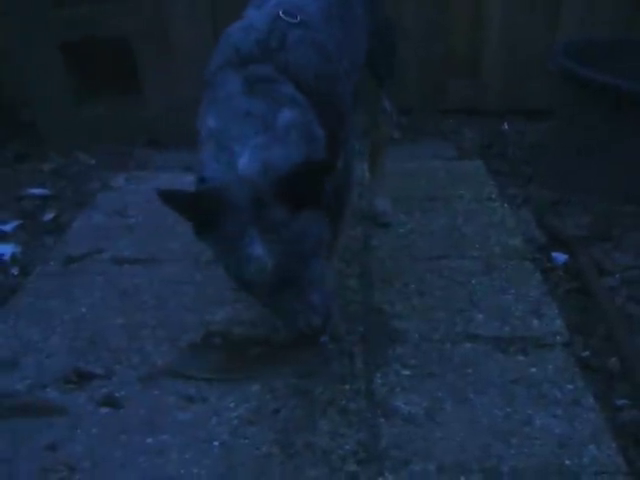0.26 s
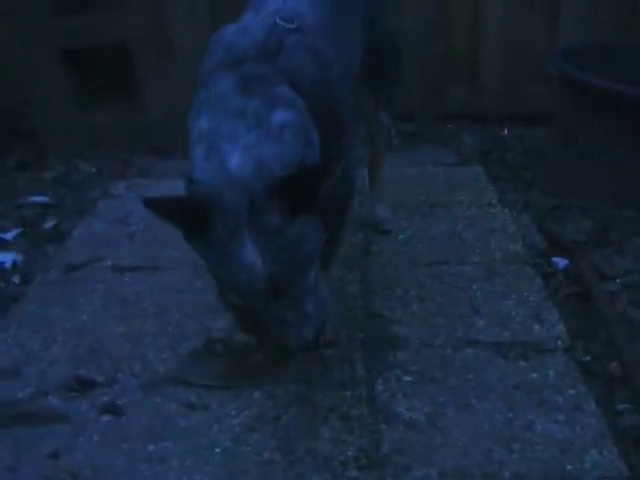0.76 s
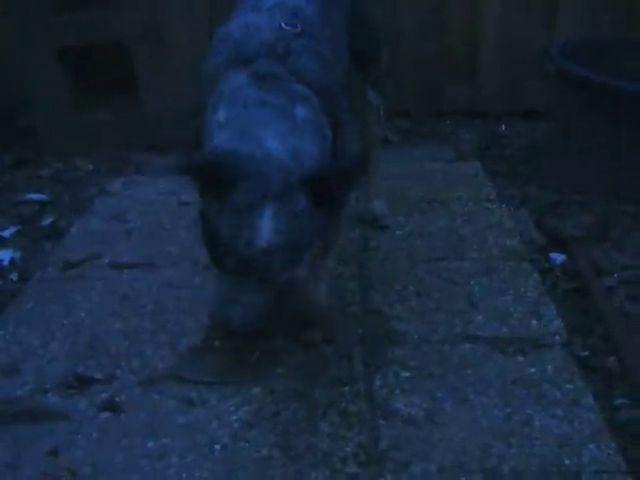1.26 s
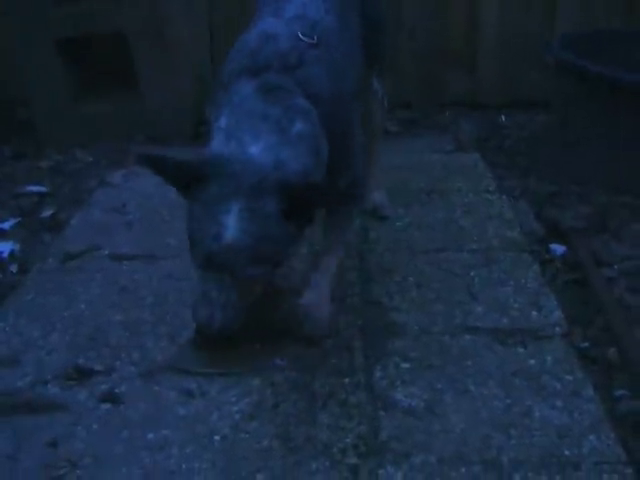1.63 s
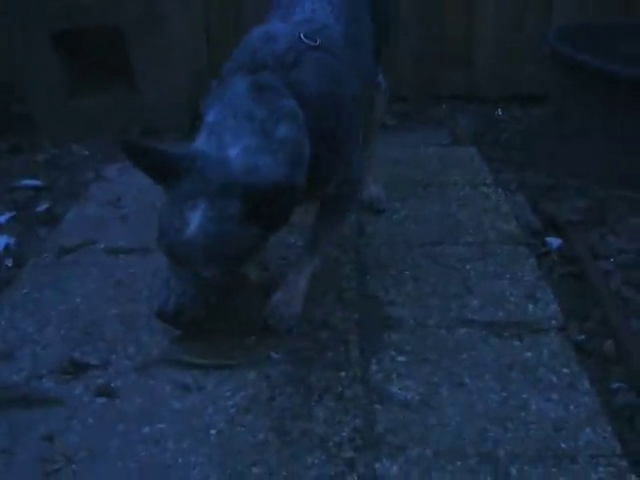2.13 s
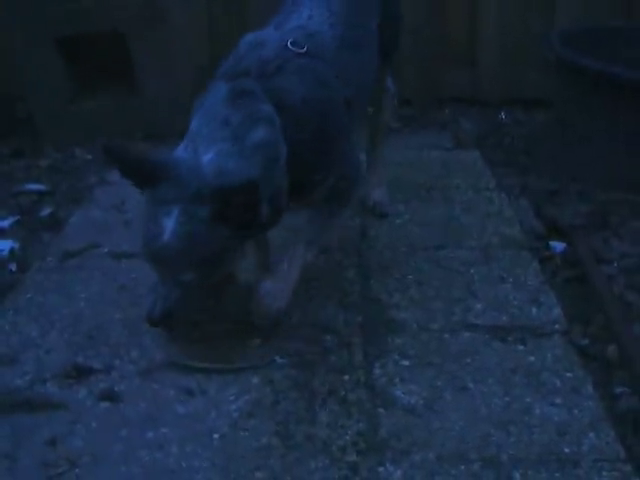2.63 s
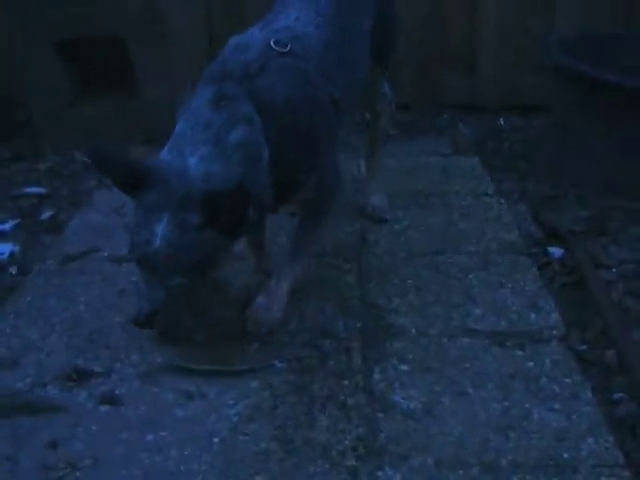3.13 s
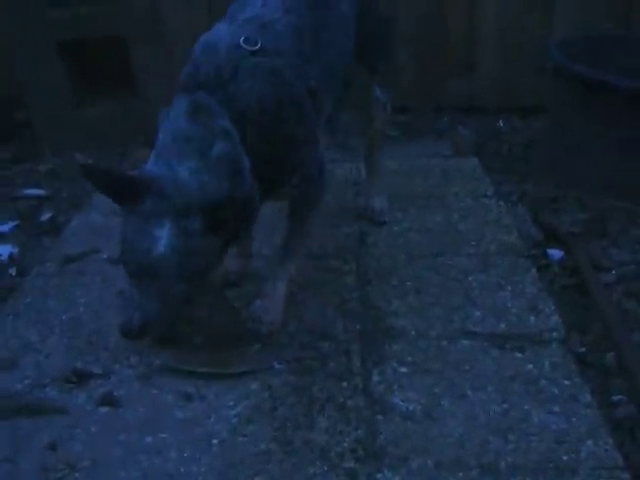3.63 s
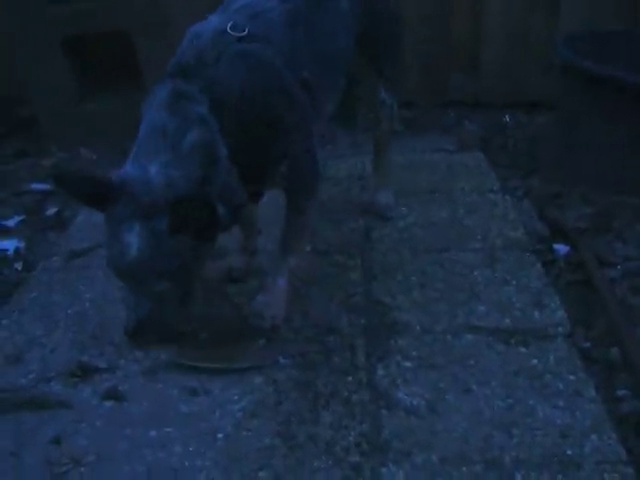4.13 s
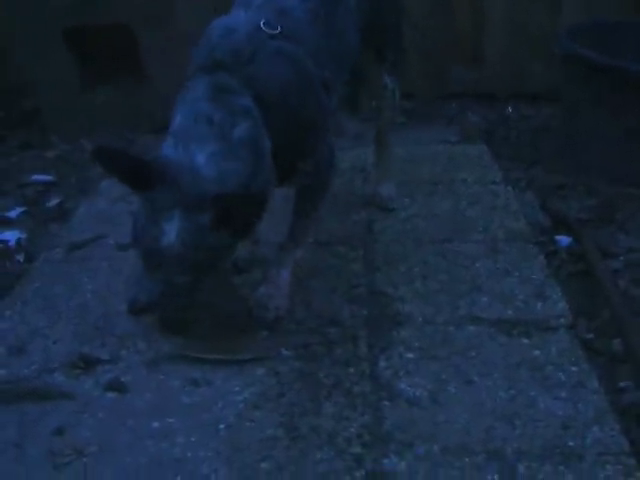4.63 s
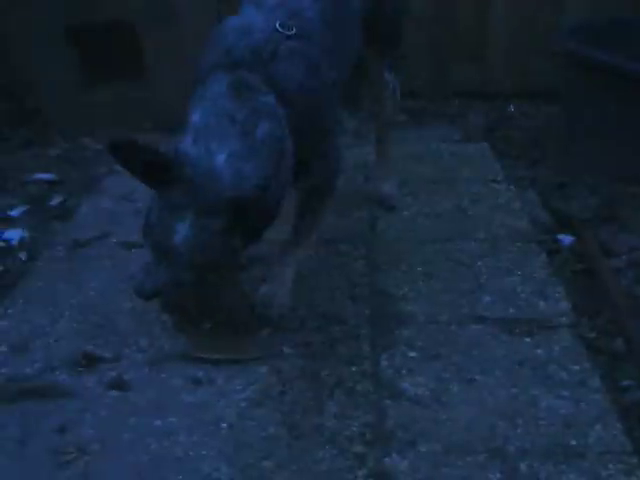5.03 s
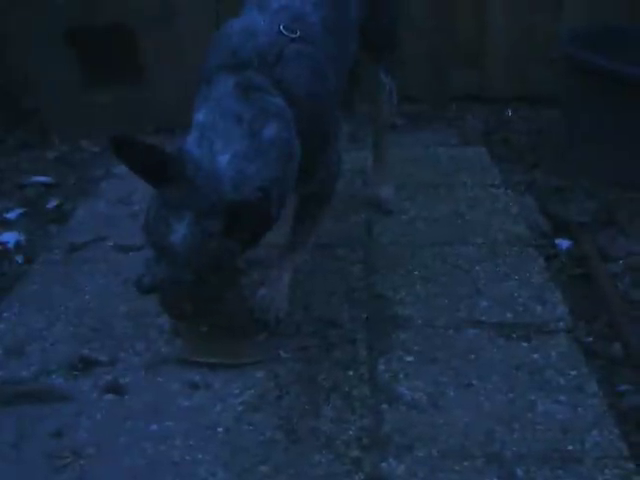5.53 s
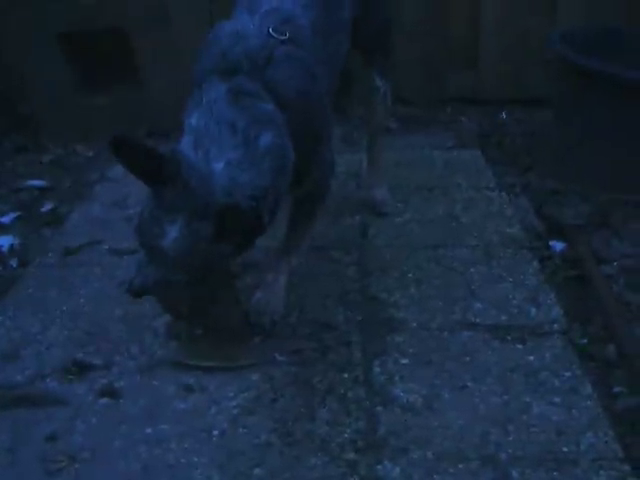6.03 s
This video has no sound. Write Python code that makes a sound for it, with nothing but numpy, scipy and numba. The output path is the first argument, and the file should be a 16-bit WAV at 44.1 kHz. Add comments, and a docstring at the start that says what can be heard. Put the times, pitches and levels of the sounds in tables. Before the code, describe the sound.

A dog chews a raw fish from a dish on an outdoor paved path, heard close through a small microphone with muffled treble. A soft bed of distant town hiss and hum, with faint road rumble, runs throughout. Quiet wet grinding begins at once; light snaps come at 0.3 and 0.55 s, doubled crunches near 0.7 and 1.0, and a firm crack at 1.5. At about 2.02 and 2.06 two very loud snaps crack in a quick cluster, knocking the dish into a brief ring, with smaller clicks to 2.2. The hardest bite lands at 2.68, ringing the dish again. Wet grinding swells around 2.5 and 3.25; a crisp click falls at 3.22 and a stronger snap at 3.74. From 4 to 6.3 s only small scattered crunches and ticks remain. Faint hollow drips, some low and some higher, dot the whole scene, and hard snaps leave a short yard echo.

```python
"""Snaps, knocks and wet crunching: a dog eats a raw fish from a dish on a paved path, a metre or two from a small camera.
Snaps and knocks are a broad crack, brief rings and a thud; crushing and grinding are bursts and streams of short grains.
Hard bites ring the dish and water drips on two hollow things, all as sums of decaying modes.
A scattered tail returns from fence and wall; the town and a far road are shaped noise behind.
The sound is muffled above about 4 kHz, and the loudest peaks are rounded off."""
import sys
import numpy as np
from scipy import signal
from scipy.fft import rfft, irfft
from scipy.io import wavfile
from scipy.ndimage import uniform_filter1d
from numba import njit

SR = 44100
rng = np.random.default_rng(int(sys.argv[2]) if len(sys.argv) > 2 else 0)


def generate_wav(signal):
    """Clip the signal to [-1, 1] and save it as 16-bit WAV at the path in sys.argv[1]."""
    frames = np.transpose(np.atleast_2d(signal))
    scaled = np.clip(frames, -1, 1) * 32767
    pcm = np.round(scaled).astype(np.int16)
    wavfile.write(sys.argv[1], SR, pcm)


N = 276507


def undb(db):
    """Amplitude factor of a level in dB."""
    return 10 ** (np.asarray(db) / 20)


def level(x, db):
    """Scale a sound by its RMS to a level in dB."""
    return x * undb(db) / np.sqrt(np.mean(x ** 2))


def ring(hz, t60, swell_s):
    """One decaying mode with peak 1; a soft contact lets it swell for a moment."""
    t = np.arange(int(t60 * SR) + 8) / SR
    decay = 1000. ** (-t / t60)
    swell = 1 - np.exp(-t / swell_s)
    sound = np.sin(2 * np.pi * hz * t) * decay * swell
    return sound / np.max(np.abs(sound))


def add(out, s, sound):
    """Mix a sound in at time s."""
    i = int(s * SR)
    out[i:i + len(sound)] += sound[:max(len(out) - i, 0)]


@njit
def grains(start, hz, decay_radians, size, count):
    """Each grain is a sine that swells and dies within a few cycles, its envelope t * exp(-t / tau)."""
    out = np.zeros(count + 4096)
    for g in range(len(start)):
        w = 2 * np.pi * hz[g] / SR
        tau = decay_radians[g] / w  # samples
        phasor = size[g] * np.e / tau + 0j  # brings the envelope's peak to size
        step = np.exp(1j * w - 1 / tau)
        for i in range(min(int(9 * tau), 4000)):
            out[start[g] + i] += i * phasor.imag
            phasor *= step
    return out[:count]


def walk(rate):
    """Random levels held 1 / rate s and slewed twice; spread near 1."""
    k = int(SR / rate)
    held = np.repeat(rng.standard_normal(N // k + 1), k)
    return 1.2 * uniform_filter1d(uniform_filter1d(held, k), k)[:N]


def snaps_and_knocks():
    """Snaps and knocks: a broad crack, brief low and high rings and a thud."""
    # snaps and knocks: [t/s, level/dB, low ring f/Hz, high ring f/Hz, high ring re level/dB, thud re level/dB]
    hits = [(0.2977, -25.5, 1240, 2600, -25, -5), (0.548, -28, 1580, 2700, -2, 0),
            (0.6896, -20, 1880, 2520, -2.5, -4), (0.7183, -19.5, 1810, 2970, -5, -7),
            (1.011, -21.5, 950, 2500, -11, -13), (1.027, -14.5, 1890, 3040, 3, -7),
            (1.347, -25, 2010, 2390, -13, -0.5), (1.3567, -20.5, 2130, 2460, -5.5, -24.5),
            (1.41, -25.5, 2280, 2500, -7, -30), (1.511, -8.5, 1600, 2385, -2, -0.5),
            (1.8318, -24.5, 2260, 2320, -8.5, 0.5), (1.852, -20, 1160, 3090, 0.5, -21),
            (2.0189, -0.5, 1623, 3420, -17, -6), (2.0295, -8, 1760, 2490, -18.5, -7),
            (2.0596, -1, 1495, 2790, -9, -1), (2.0688, -10.5, 1710, 2430, -13.5, -0.5),
            (2.078, -5, 1400, 2900, -4, -10), (2.1226, -18, 1670, 3130, -6.5, -11),
            (2.147, -29.5, 1580, 2960, -1.5, -8), (2.1827, -20, 1460, 3170, 0, -23),
            (2.188, -12.5, 1710, 2940, 0, -31), (2.2067, -15.5, 1480, 2400, -10.5, -31),
            (2.457, -25, 1760, 2980, 4, -5.5), (2.4678, -31.5, 1100, 2340, 1, 10),
            (2.6752, 2, 1582, 3040, -17.5, -9.5), (2.687, -7, 1680, 2600, -22, -12),
            (2.823, -23.5, 1470, 3060, -6, -21), (2.894, -30, 1610, 3030, -1.5, -21),
            (3.0332, -31.5, 1350, 2800, 1, -20), (3.054, -24.5, 1070, 3050, -5, -17),
            (3.1998, -20.5, 1100, 3240, 0, -21), (3.2198, -11, 1060, 3510, 0, -25),
            (3.2452, -21, 1080, 3040, 0, -20), (3.678, -27, 1430, 2310, -14, -14),
            (3.7264, -28, 1750, 2250, -6, -28), (3.7341, -22, 1780, 2900, 2, -29),
            (3.7447, -9, 1456, 2230, -6.5, -34), (3.8395, -23.5, 1700, 2990, 0, -13),
            (3.875, -23.5, 1480, 2860, -5.5, -20), (4.0138, -30, 1090, 3220, 0, -12),
            (4.129, -23, 1200, 2740, -15.5, -5), (4.16, -26, 1700, 3380, 0, -12),
            (4.5562, -24.5, 1260, 2950, -2, -27), (4.623, -28, 2090, 2670, 0.5, -21),
            (4.693, -19, 1230, 3010, 0, -29), (4.8228, -21.5, 1650, 2630, -7.5, -14),
            (5.436, -27.5, 1670, 2940, -8.5, -6), (5.4846, -28.5, 2000, 2260, -12.5, -17),
            (5.6336, -27, 1300, 2350, -3, -25), (5.8366, -18, 1100, 2500, -3, -3.5),
            (6.249, -23.5, 1150, 2950, -6, -12)]
    # thud modes: [f/Hz, level/dB, t60/s, swell/s]
    thud_modes = [(600, 0, .011, .0003), (920, -5, .009, .0003), (300, -19, .015, .001)]
    low_t60_s, high_t60_s = .009, .006
    out = np.zeros(N)
    for s, hit_db, low_hz, high_hz, high_db, thud_db in hits:
        high = min(undb(high_db), .99)  # always leaves some low ring
        low = np.sqrt(1 - high ** 2)
        crack = np.sqrt(high) * ring(high_hz * .9, .0015, .0001)
        add(out, s, undb(hit_db - 2) * crack)
        add(out, s, undb(hit_db) * low * ring(low_hz, low_t60_s, 0.00067))
        add(out, s, undb(hit_db) * high * ring(high_hz, high_t60_s, .0003))
        for hz, db, t60, swell_s in thud_modes:
            add(out, s, undb(hit_db + thud_db + db) * ring(hz, t60, swell_s))
    return out


def crushes(count=50):
    """A bite breaks many splinters in a burst of grains that swells fast and fades."""
    # crushing bites: [t/s, length/s, level/dB, centre f/Hz]
    bites = [(0.666, 0.036, -28, 2840), (0.704, 0.047, -26, 2760), (0.95, 0.021, -33.5, 2770),
             (1.008, 0.052, -20.5, 2350), (1.06, .04, -36, 2940), (1.338, 0.045, -29, 2160),
             (1.396, 0.031, -31, 2960), (1.511, 0.029, -21.5, 1820), (1.805, 0.029, -32, 2300),
             (1.83, 0.047, -24, 1720), (1.984, 0.018, -24, 3330), (2.018, 0.021, -14, 2500),
             (2.058, 0.03, -16, 2500), (2.098, 0.055, -32, 2600), (2.184, .012, -18.5, 2940),
             (2.196, 0.044, -23, 1938), (2.326, 0.029, -34, 1820), (2.445, 0.039, -28.5, 1930),
             (2.519, 0.028, -34.5, 2140), (2.591, 0.016, -32, 1410), (2.645, 0.031, -25.5, 3000),
             (2.684, 0.012, -22, 2400), (2.764, 0.012, -34.5, 3000), (2.787, 0.022, -29.5, 3000),
             (3.041, 0.036, -32.5, 1134), (3.162, .04, -35, 2800), (3.25, 0.077, -35, 1000),
             (3.36, 0.058, -28, 2880), (3.722, 0.027, -23.5, 2470), (3.742, 0.024, -19.5, 1650),
             (3.854, 0.042, -37.5, 1810), (3.915, 0.065, -33, 2660), (4.106, 0.063, -34, 3100),
             (4.524, 0.068, -31.5, 2500), (4.602, 0.037, -32, 2060), (4.69, 0.033, -25, 2720),
             (4.817, 0.043, -32, 1650), (4.996, 0.043, -36.5, 1440), (5.034, 0.059, -34.5, 2080),
             (5.145, 0.036, -35, 2690), (5.196, 0.018, -35.5, 2400), (5.245, 0.051, -36.5, 1950),
             (5.425, 0.03, -35.5, 1920), (5.465, .055, -32.5, 2160), (5.627, 0.031, -33, 2400),
             (5.825, 0.031, -30, 1820), (5.888, .04, -34, 2040), (6.112, 0.026, -31.5, 2500),
             (6.235, .03, -35, 1900)]
    s, length_s, db, hz = np.transpose(bites)
    # a longer bite breaks pieces of more sizes, up to a widest spread and the ring of the smallest splinter
    octaves_per_s, widest_octaves, smallest_hz = 36, 1.32, 4200
    limit = np.minimum(widest_octaves, np.log2(smallest_hz / hz))
    octaves = np.clip(octaves_per_s * length_s, 0, limit)
    late, pitch, nudge, size, sign = rng.random((len(s), count, 5)).T
    start = np.clip((s + length_s * late) * SR, 0, N - 1).astype(np.int64)
    grain_hz = np.minimum(hz * 2 ** (octaves * (pitch + nudge - 1)), 4500)
    shape = np.sin(np.pi * late ** .5)
    # most splinters are small, a few are large, none is larger than the bone allows
    size_db = 3.0 * np.minimum(-np.log(1 - size), 3)
    gain = undb(db + size_db) * np.sqrt(length_s / 0.11) * shape * np.sign(sign - .5)
    return grains(start.ravel(), grain_hz.ravel(), np.full(start.size, 5.0), gain.ravel(), N)


def grind():
    """Steady fine grains of flesh and scale; brightness shifts weight to the high ones."""
    # grinding of the jaws: [t/s, level/dB]
    grinding = [(0.0, -45), (0.5, -45.5), (1.27, -39.5), (1.68, -42), (2.27, -47.5), (2.55, -34),
                (2.95, -42), (3.25, -34), (3.5, -41), (4.3, -41.5), (6.27, -41)]
    grains_per_s, bright_db_per_octave = 900, 0.9
    s, pitch, size, sign = rng.random((int(grains_per_s * N / SR), 4)).T
    s = s * N / SR
    octave = 2.6 * pitch  # above 700 Hz
    when, level_db = np.transpose(grinding)
    tilt_db = bright_db_per_octave * (octave - 1.3)
    size_db = 2.76 * np.minimum(-np.log(1 - size), 4)  # mostly small, a few large
    db = np.interp(s, when, level_db) + tilt_db + size_db - 5.5
    gain = undb(db) * np.sign(sign - .5)
    return grains((s * SR).astype(np.int64), 700 * 2 ** octave, np.full(len(s), 4.5), gain, N)


def struck(blows, modes):
    """Each blow rings the modes of the thing it hits in a randomly varied mix."""
    out = np.zeros(N)
    share = rng.uniform(-0.83, 1, (len(blows), len(modes)))
    gains = np.sign(share) * undb(3 * share)
    for (s, blow_db), row in zip(blows, gains):
        for (hz, db, t60), gain in zip(modes, row):
            add(out, s, gain * undb(blow_db + db) * ring(hz, t60, 0.0025))
    return out


def dish_knocks():
    """Hard bites knock the dish, which rings in a cluster of close modes."""
    # bites that knock the dish: [t/s, level/dB]
    hard_bites = [(2.020, -17), (2.061, -16.5), (2.676, -12)]
    # dish modes: [f/Hz, level/dB, t60/s]
    dish_modes = [(1360, -20, .25), (1470, -18, .25), (1520, -22.5, 0.26), (1574, -15.5, 0.21),
                  (1620, -21.5, 0.24), (1640, -14.5, 0.29), (1740, -15, .3), (1735, -16.5, .3),
                  (1780, -25.5, .2)]
    return struck(hard_bites, dish_modes)


def drips():
    """Water drips on a low and on a higher hollow thing, each ringing in two modes."""
    # drips on the low and on the higher thing: [t/s, level/dB]
    low_drops = [(0.667, -38), (1.036, -34.5), (1.367, -35), (1.798, -34.5), (1.905, -34.5), (2.532, -35.5),
                 (4.866, -33), (5.8, -34.5), (5.906, -33)]
    high_drops = [(0.837, -36.5), (1.243, -37.5), (1.581, -38.5), (2.17, -32), (2.336, -37.5), (4.743, -33),
                  (5.578, -35), (6.171, -34)]
    # modes of the low and of the higher thing: [f/Hz, level/dB, t60/s]
    low_modes = [(297.6, 3, 0.09), (610, -7, .06)]
    high_modes = [(600, 2, 0.11), (686, 5, 0.013)]
    return struck(low_drops, low_modes) + struck(high_drops, high_modes)


def yard(x):
    """The direct sound and a scattered tail of decaying noise from fence and wall."""
    t60_s, tail_db = 0.34, -9.5  # tail energy against the direct sound
    t = np.arange(int(.6 * SR)) / SR
    onset = 1 - np.exp(-(t / 0.0009) ** 2)
    tail = rng.standard_normal(len(t)) * 1000. ** (-t / t60_s) * onset
    response = undb(tail_db) * tail / np.sqrt(np.sum(tail ** 2))
    response[0] = 1  # direct sound
    return signal.fftconvolve(x, response)[:N]


def town():
    """Distant hiss and hum: noise in octave bands that swell a little together and flicker alone."""
    # spectrum of the far town: [f/Hz, relative level per Hz/dB]
    spectrum = [(25, -42), (45, -10), (80, -25.5), (130, -6.5), (200, -5), (350, -0.5), (520, 1), (900, -4),
                (1350, -10), (2900, -15), (4500, -19)]
    hz, db = np.transpose(spectrum)
    f = np.maximum(np.arange(N // 2 + 1) * SR / N, 1)
    noise = rfft(rng.standard_normal(N)) * undb(np.interp(np.log(f), np.log(hz), db))
    out, swell = 0, walk(1.63)
    for octave in range(4, 14):  # centred on 2 ** octave Hz, crossfading into its neighbours
        share = np.cos(np.pi / 2 * np.clip(np.log2(f) - octave, -1, 1)) ** 2
        flicker_db = 1.4 * swell + 0.47 * walk(8.1)
        out = out + undb(flicker_db) * irfft(noise * share, N)
    return level(out, -41.5)


def rumble():
    """A low band of engine and tyre noise from a far road, swelling and flickering."""
    # far traffic swelling: [t/s, level/dB]
    traffic = [(0.0, -53.5), (1.75, -57.5), (3.399, -55), (4.7, -52.5), (6.27, -54.5)]
    s, db = np.transpose(traffic)
    band_filter = signal.butter(2, (90, 165), "band", fs=SR, output="sos")
    band = signal.sosfilt(band_filter, rng.standard_normal(N))
    swell_db = np.interp(np.arange(N) / SR, s, db)
    return level(band, 0) * undb(swell_db + 1.4 * walk(3.8) + 1.7 * walk(13))


def scene():
    """Eating, dish and drips sound in the yard; town and road lie behind."""
    thin = signal.butter(2, 180, "high", fs=SR, output="sos")
    eating = signal.sosfilt(thin, snaps_and_knocks() + crushes() + grind())
    near = eating + dish_knocks() + drips()
    return (yard(near) + town() + rumble())[None]


def record(dry):
    """The sound is muffled above about 4 kHz and slightly offset; the loudest peaks are rounded off."""
    muffle_hz, wall_hz, top_hz = 3650, 4400, 16000  # low-pass edges; the last follows the ceiling
    ceiling, offset = .7, -.0415  # of full scale
    muffled = signal.sosfilt(signal.butter(12, muffle_hz, fs=SR, output="sos"), dry)
    muffled = signal.sosfilt(signal.ellip(10, .5, 70, wall_hz, fs=SR, output="sos"), muffled) + offset
    rounded = muffled / (1 + (muffled / ceiling) ** 24) ** (1 / 24)
    return signal.sosfilt(signal.ellip(8, .2, 70, top_hz, fs=SR, output="sos"), rounded)


dry = scene()
out = record(dry)
generate_wav(out)
```